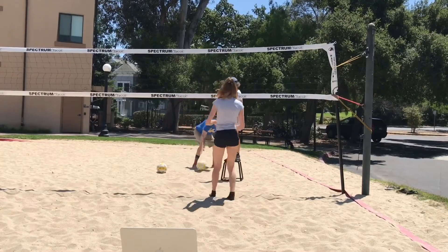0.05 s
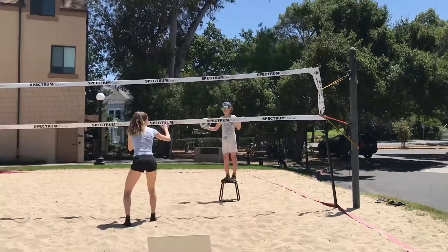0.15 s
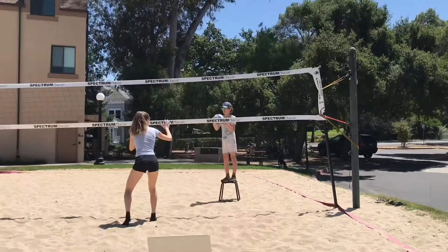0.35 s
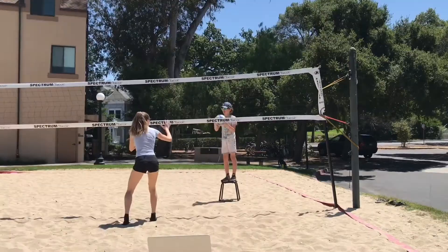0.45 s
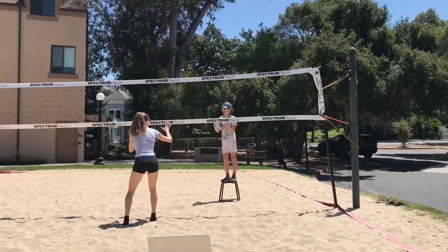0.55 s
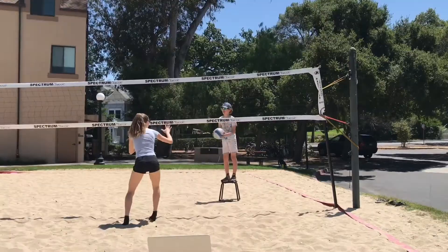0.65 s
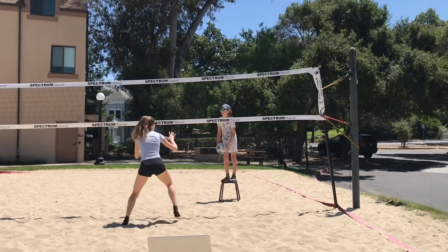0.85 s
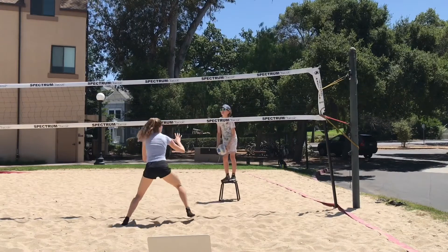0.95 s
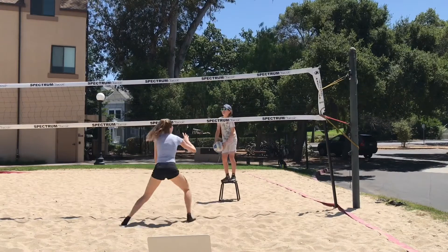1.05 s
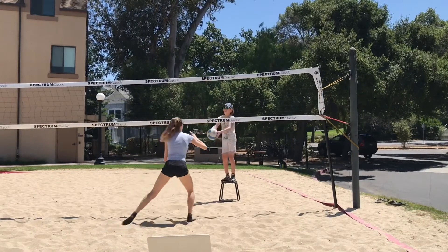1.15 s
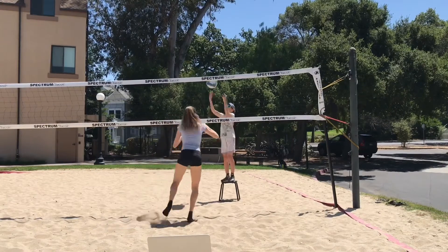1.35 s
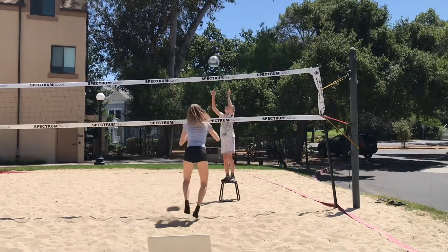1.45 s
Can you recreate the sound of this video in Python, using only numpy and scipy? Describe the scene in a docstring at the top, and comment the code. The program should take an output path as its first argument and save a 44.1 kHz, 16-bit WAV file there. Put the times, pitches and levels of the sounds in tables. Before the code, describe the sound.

A hand hits a volleyball with one sharp crack, outdoors over faint wind.

```python
"""A hand cracks against a volleyball on an outdoor sand court, a few metres away.
Palm and fingers slap in quick succession, the ball thumps and the air inside it rings;
house fronts and trees throw the crack back. Feet scuff faintly in the sand and a light wind
rumbles and rustles, with a far low hum and two tiny chirps behind it."""
import sys
import numpy as np
from scipy import signal
from scipy.fft import rfft, irfft
from scipy.io import wavfile

SR = 44100
rng = np.random.default_rng(int(sys.argv[2]) if len(sys.argv) > 2 else 0)


def put_to_file(sound):
    """Save the sound as 16-bit audio at rate SR, in the file named by the first command-line argument."""
    columns = np.atleast_2d(sound).T  # one column per channel
    safe = np.clip(columns, -1, 1)
    whole_steps = np.round(safe * 32767)
    wavfile.write(sys.argv[1], SR, whole_steps.astype(np.int16))


N = 66150
HIT_S, FINGERS_LAG_S = .22195, .00145  # the palm lands first, the fingers just after

# Tone of the sound scattered by sand, net and leaves; the ball's sizzle shares it.
# Each row: frequency in Hz, relative level in dB.
SCATTER_TONE = [(100, 6.5), (400, -2), (700, -6), (1300, 3.5), (2200, -2), (3300, -0.5), (5000, -2.5),
                (7000, -9), (9000, -10.5), (12000, -16), (16000, -26)]


def slap():
    """The palm and then the fingers strike the ball, each with a sharp click."""
    # Tone of the two slaps. Each row: frequency in Hz, palm level in dB, finger level in dB.
    slap_tone = [(59.3, -34, -11), (231, 9, 3.9), (427, 5, 0.5), (810, 16.5, 9.5), (1460, 15.5, 16.5),
                 (2300, 5.5, 11.5), (2770, 8.5, 8.5), (3170, 19, 2.4), (3820, 13, 3), (4270, 11, -10),
                 (5340, 6.3, 2.3), (6530, -0.2, -8), (8400, -4.5, 1.5), (10600, -10.5, -8.5),
                 (13540, -0.5, -24), (16800, -10, -29)]
    palm = pulse(curve(slap_tone), HIT_S)
    fingers = pulse(curve(slap_tone, column=2), HIT_S + FINGERS_LAG_S)
    return palm + fingers


def ball_ring():
    """The air inside the ball rings briefly at many pitches at once."""
    # The ball's tones. Each row: pitch in Hz, level in dB, seconds to fade by 60 dB.
    tones = [(572, -36.2, 0.047), (722, -31.4, 0.041), (860, -36.0, 0.035), (1074, -37.0, 0.052),
             (1196, -35.8, 0.04), (1425, -32.0, 0.041), (1560, -29.1, 0.04), (1909, -25.9, 0.032),
             (2470, -33.6, 0.047), (3090, -29.8, 0.034), (3484, -29.3, 0.031), (3985, -27.7, 0.03),
             (5020, -35.1, 0.03), (5450, -32.7, 0.03)]
    t = since(HIT_S)
    return sum(undb(db) * np.sin(2 * np.pi * hz * t) * swell(HIT_S, rise_s=.001, fade_s=fade_s)
               for hz, db, fade_s in tones)


def sizzle():
    """The skin of the ball sizzles just after the blow."""
    return undb(-21.5) * noise(curve(SCATTER_TONE)) * swell(HIT_S, rise_s=.0007, fade_s=.027)


def thump():
    """Under the whole hand the ball flattens and springs back: a few low cycles that sag in pitch."""
    start_hz, end_hz, sag_s = 218, 47, .007
    start = HIT_S + FINGERS_LAG_S
    t = since(start)
    cycles = end_hz * t + (start_hz - end_hz) * sag_s * (1 - np.exp(-t / sag_s))
    return undb(-11.5) * np.sin(2 * np.pi * cycles) * swell(start, rise_s=.0031, fade_s=.061)


def echoes(crack):
    """Walls and trunks send back thinner, duller copies of the crack; some knock hollow."""
    # The echoes. Each row: arrival in seconds, level in dB, smear in seconds,
    # frequency in Hz above which it dulls, boost or cut of the hollow knock in dB.
    reflections = [(0.2276, -22.5, .0005, 6600, 2), (0.2634, -21, 0.00014, 3900, -10),
                   (0.2862, -31.5, .002, 9000, -4), (0.3071, -30.5, 0.0023, 5200, -1),
                   (0.3176, -24, .0012, 3800, -9), (0.3242, -28, .002, 7200, -1),
                   (0.3417, -24.5, .0004, 5130, -9), (.3529, -20, .0016, 8000, 4),
                   (0.3561, -27, .003, 6100, -1), (.3623, -24.5, .003, 8000, 5),
                   (0.3694, -28.5, 0.0014, 6000, 0), (.4197, -29.5, .0004, 5500, -14),
                   (.437, -36, 0.0061, 7000, -3)]
    thin_below_hz, knock_hz, knock_octaves = 760, 1250, .36
    clean_share = .7  # this part of the energy bounces as off a mirror; the rest is smeared
    thin_crack = rfft(crack) * (1 - lowpass(thin_below_hz, order=2))
    knock_band = np.exp(-(np.log2(freqs() / knock_hz) / knock_octaves) ** 2)
    bounces = 0
    for arrival, db, smear_s, dull_hz, knock_db in reflections:
        delay = arrival - HIT_S
        t = since(delay)
        smear = rng.standard_normal(N) * (t > 0) * np.exp(-t / smear_s)
        smeared = rfft(smear / np.linalg.norm(smear))
        clean = np.exp(-2j * np.pi * freqs() * delay)
        wall = np.sqrt(clean_share) * clean + np.sqrt(1 - clean_share) * smeared
        bounces += undb(db + knock_db * knock_band) * lowpass(dull_hz, order=2) * wall
    return irfft(thin_crack * bounces, N)


def scatter():
    """The court scatters the crack into a bright, fluttering tail; the trees add a later, duller one."""
    tone = curve(SCATTER_TONE)
    court = undb(-43) * noise(tone) * swell(HIT_S, rise_s=.026, fade_s=.73)
    trees = undb(-46) * noise(tone * lowpass(4470, order=2)) * swell(.298, rise_s=.014, fade_s=.7)
    flutter_db = 2.2 * drift(hz=220)
    return (court + trees) * undb(flutter_db)


def scuffs():
    """Sand shifts under the feet in short, faint hisses."""
    # The scuffs. Each row: start in seconds, level in dB, decay in seconds, centre frequency in Hz.
    foot_scuffs = [(0.7133, -61.5, 0.002, 8350), (0.904, -64.5, 0.004, 7000), (0.903, -54.5, 0.0036, 1660),
                   (.9535, -72, 0.0079, 6950), (1.024, -70, .002, 8900), (1.39, -68, 0.0054, 6000),
                   (1.484, -60.5, .02, 5800)]
    width_octaves = .82
    out = 0
    for start, db, decay, hz in foot_scuffs:
        age = since(start) / decay
        grains = noise(np.exp(-np.abs(np.log2(freqs() / hz)) / width_octaves))
        out += undb(db) * grains * age * np.exp(1 - age)
    return out


def wind():
    """A breeze swells and rumbles at the microphone under a steady rustle of leaves."""
    # Tone of the wind. Each row: frequency in Hz, relative level in dB.
    wind_tone = [(15, -43), (25, -24.5), (50, -4), (70, 1.5), (97, -5.5), (157, -8), (212, -14),
                 (277, -19.5), (416, -27), (451, -30), (754, -28), (1440, -33), (2280, -39), (4030, -37),
                 (4870, -44.5), (6380, -47), (7710, -51.5), (13200, -55), (16000, -57)]
    # Its slow swell. Each row: time in seconds, rumble change in dB, rustle change in dB.
    breeze = [(.1, -1.5, -0.5), (.5, 0.5, 0), (.72, 1, 1), (.84, 2, 0), (1, 1, .5), (1.2, -1.5, -0.83),
              (1.5, -1, -0.5)]
    # Its level dips briefly twice at the start. Each row: time in seconds, change in dB.
    dips = [(0, -0.5), (.018, -2.5), (.036, -22.5), (0.05, -1.5), (0.069, -3.5), (.086, -20), (.106, 0.5),
            (.14, 1)]
    t = since(0)
    lows = lowpass(hz=315)
    highs = np.sqrt(1 - lows ** 2)
    times, rumble_db, rustle_db = np.array(breeze).T
    rumble_gain = undb(-48.5 + np.interp(t, times, rumble_db) + drift(hz=7.9))
    rumble = rumble_gain * noise(curve(wind_tone) * lows)
    rustle_gain = undb(-60.5 + np.interp(t, times, rustle_db) + .3 * drift(hz=8.5))
    rustle = rustle_gain * noise(curve(wind_tone) * highs)
    return (rumble + rustle) * undb(np.interp(t, *np.array(dips).T))


def hum():
    """A low, wavering drone, perhaps far traffic, swells and fades."""
    pitch_hz = 71 * (1 + .029 * drift(hz=8))
    phase = 2 * np.pi * np.cumsum(pitch_hz) / SR
    return undb(-47) * np.sin(phase) * bump(peak_s=.88, width_s=.15)


def chirps():
    """Two tiny high peeps, perhaps a far bird."""
    # The peeps. Each row: loudest moment in seconds, level in dB.
    peeps = [(0.604, -65), (1.077, -68)]
    pitch_hz, width_hz = 6300, 220
    band = np.exp(-((freqs() - pitch_hz) / width_hz) ** 2)
    return noise(band) * sum(undb(db) * bump(peak_s, width_s=.0037) for peak_s, db in peeps)


def undb(db):
    """Turn decibels into a gain to multiply by."""
    return 10 ** (np.asarray(db) / 20)


def freqs():
    """The frequencies of the spectrum in Hz, never below 1."""
    return np.maximum(np.arange(N // 2 + 1) * SR / N, 1)


def since(start):
    """Seconds since a moment, zero before it."""
    return np.maximum(np.arange(N) / SR - start, 0)


def curve(points, column=1):
    """A gain for each frequency, from a table of Hz and dB."""
    table = np.array(points, float)
    return undb(np.interp(np.log(freqs()), np.log(table[:, 0]), table[:, column]))


def lowpass(hz, order=4):
    """Gains that keep the lows and fade out above hz."""
    return 1 / np.sqrt(1 + (freqs() / hz) ** (2 * order))


def noise(gain):
    """Noise with this tone and an average (rms) level of 1."""
    shaped = irfft(rfft(rng.standard_normal(N)) * gain, N)
    return shaped / np.sqrt(np.mean(shaped ** 2))


def pulse(gain, start):
    """The sharpest click with this tone that begins at start."""
    cepstrum = irfft(np.log(gain), N)
    # Folding onto the first half keeps the click from ringing before it starts.
    cepstrum[1:N // 2] *= 2
    cepstrum[N // 2 + 1:] = 0
    return irfft(np.exp(rfft(cepstrum) - 2j * np.pi * freqs() * start), N)


def swell(start, rise_s, fade_s):
    """A level that rises, then falls by 60 dB every fade_s seconds."""
    t = since(start)
    return (1 - np.exp(-t / rise_s)) * np.exp(-np.log(1000) * t / fade_s)


def bump(peak_s, width_s):
    """A smooth, bell-shaped rise and fall."""
    return np.exp(-((since(0) - peak_s) / width_s) ** 2)


def drift(hz):
    """A random wobble of about 1 either way, mostly slower than hz."""
    return noise(lowpass(hz, order=2))


def scene():
    """The hit, its echoes and the open air, in one channel."""
    crack = slap() + ball_ring() + sizzle()
    return (crack + thump() + echoes(crack) + scatter() + scuffs() + wind() + hum() + chirps())[None]


def record(dry):
    """Clip the sound at full scale and cut the highest treble."""
    top_hz = 16300
    treble_cut = signal.ellip(8, .2, 70, top_hz, fs=SR, output="sos")
    return signal.sosfilt(treble_cut, np.clip(dry, -1, 1))


dry = scene()
out = record(dry)
put_to_file(out)
```